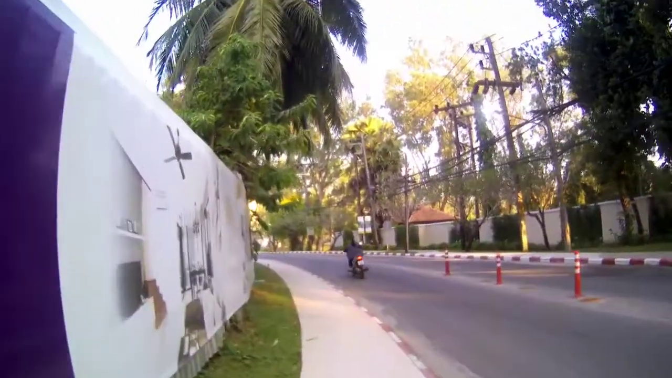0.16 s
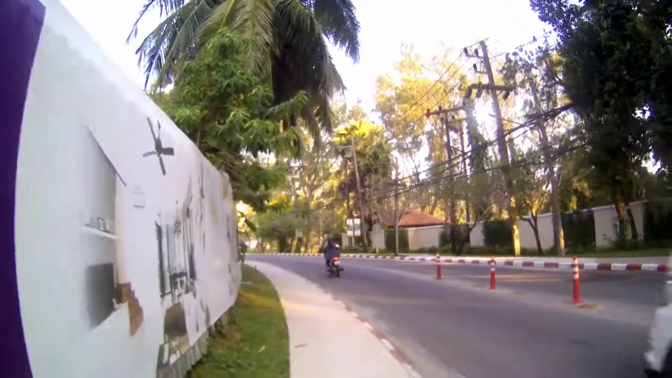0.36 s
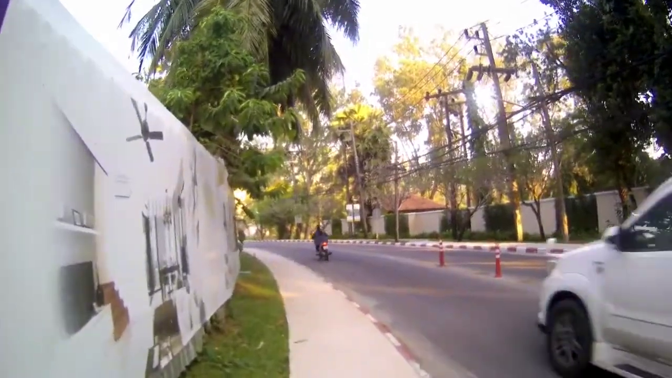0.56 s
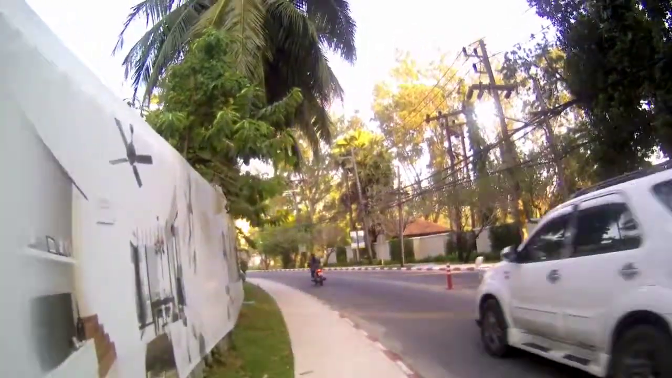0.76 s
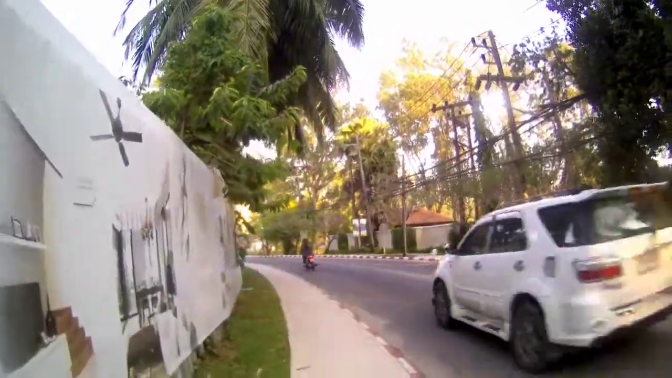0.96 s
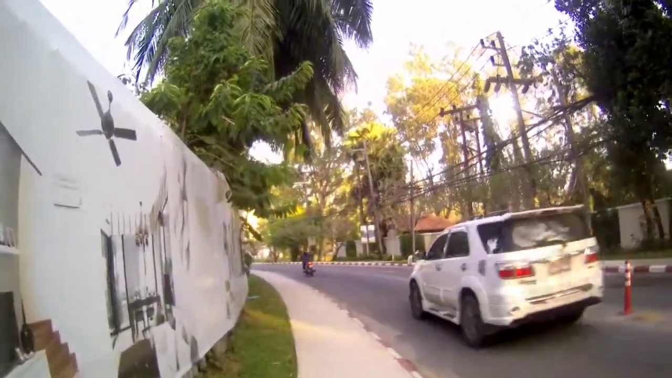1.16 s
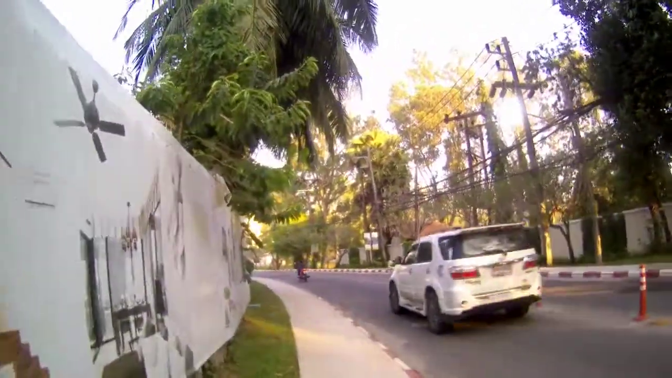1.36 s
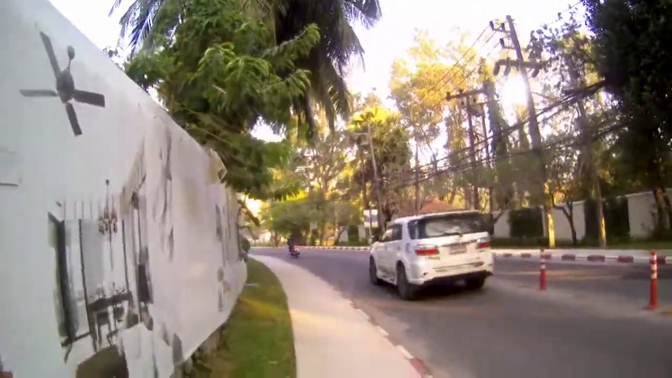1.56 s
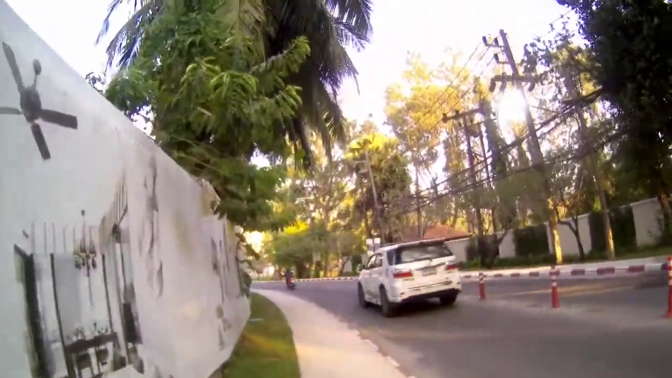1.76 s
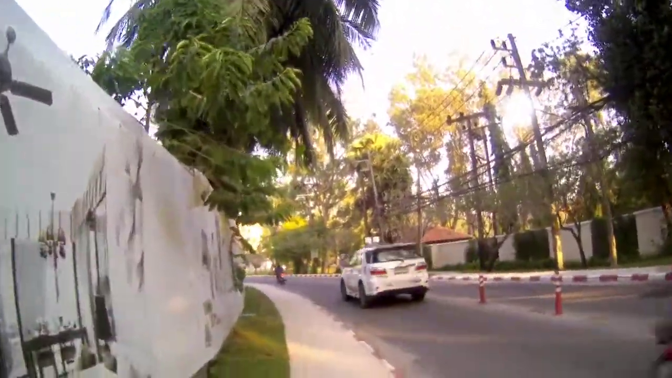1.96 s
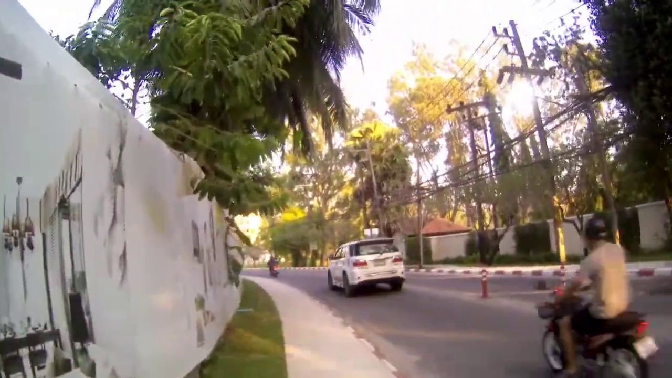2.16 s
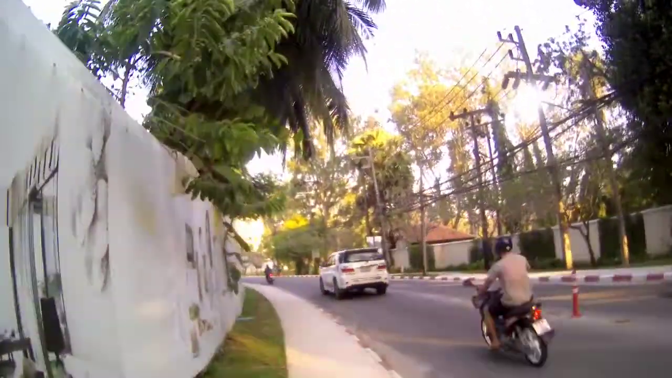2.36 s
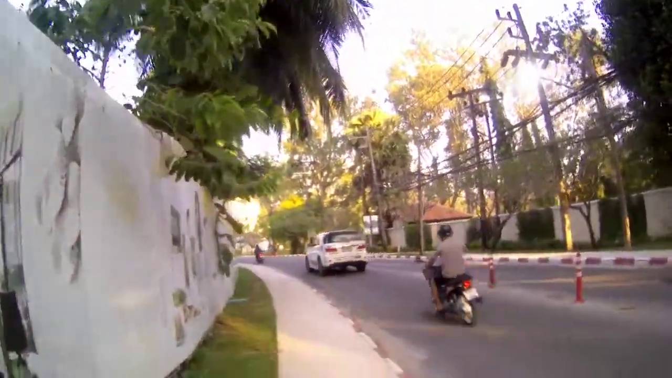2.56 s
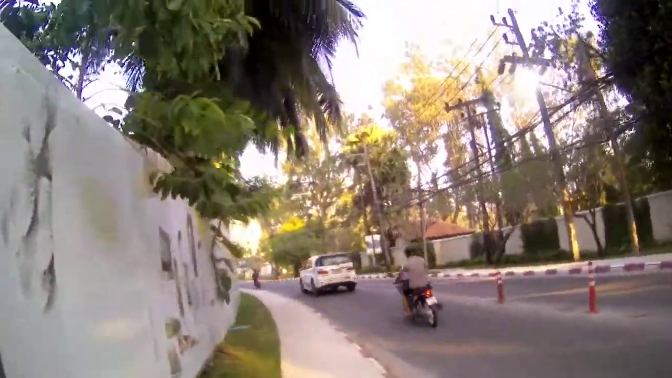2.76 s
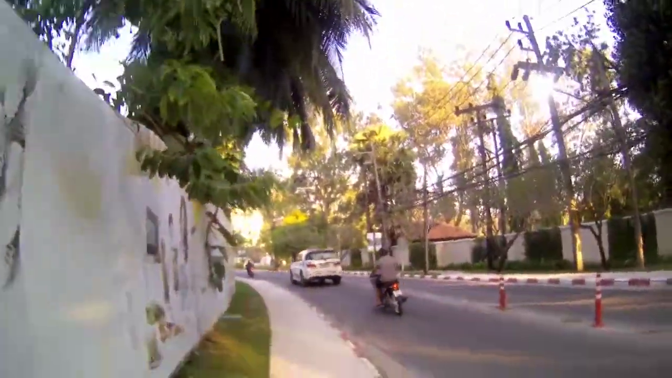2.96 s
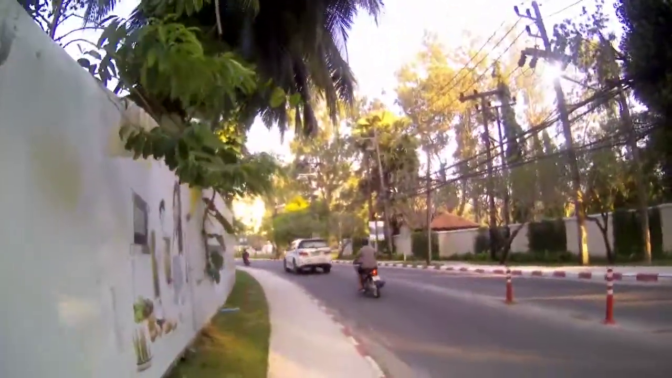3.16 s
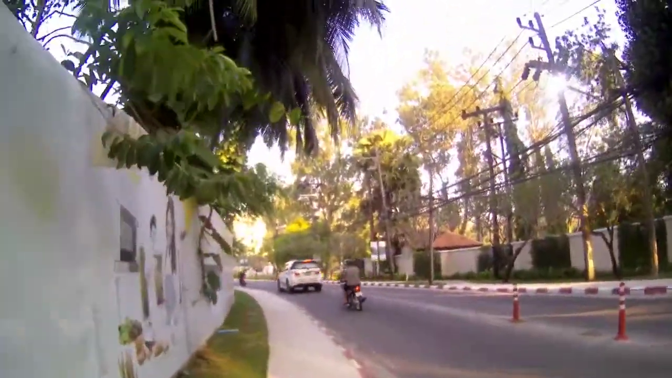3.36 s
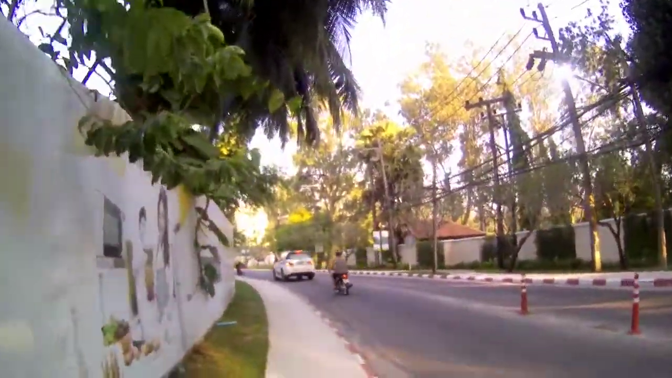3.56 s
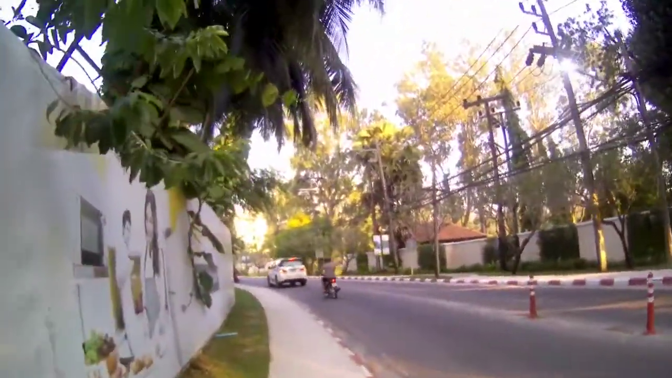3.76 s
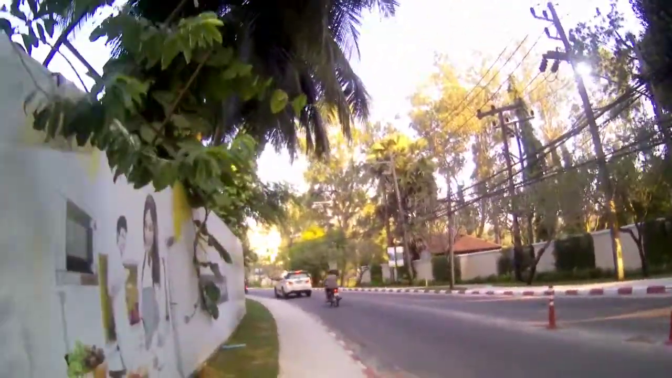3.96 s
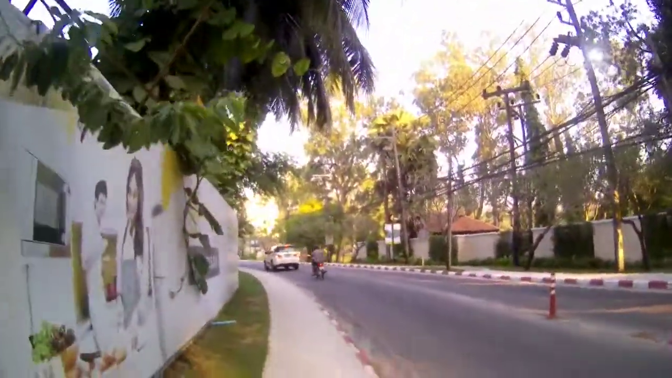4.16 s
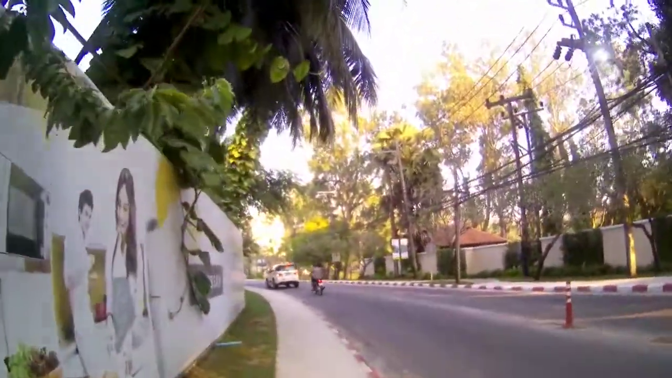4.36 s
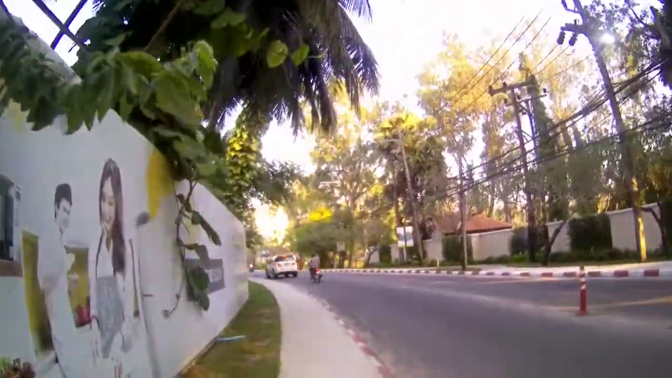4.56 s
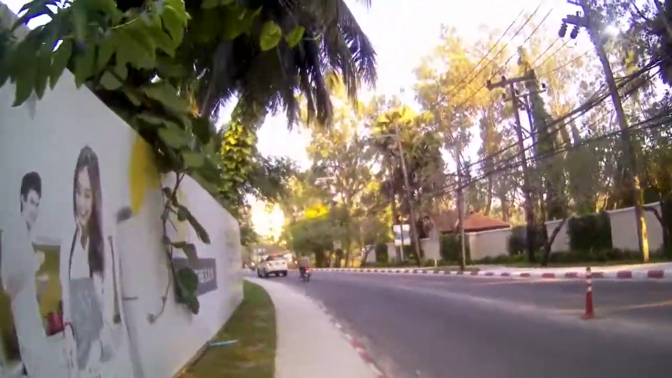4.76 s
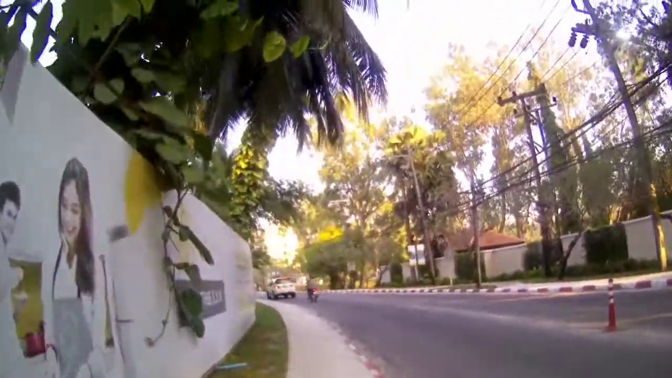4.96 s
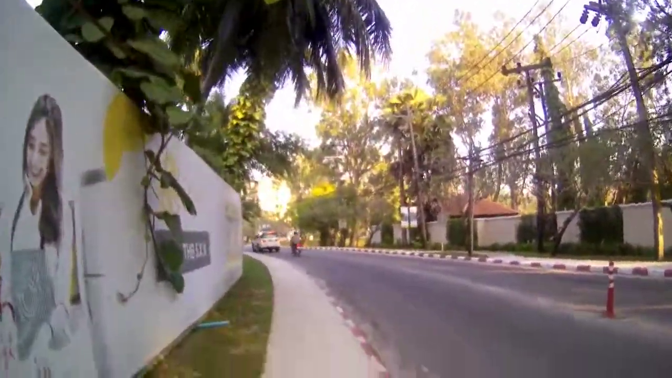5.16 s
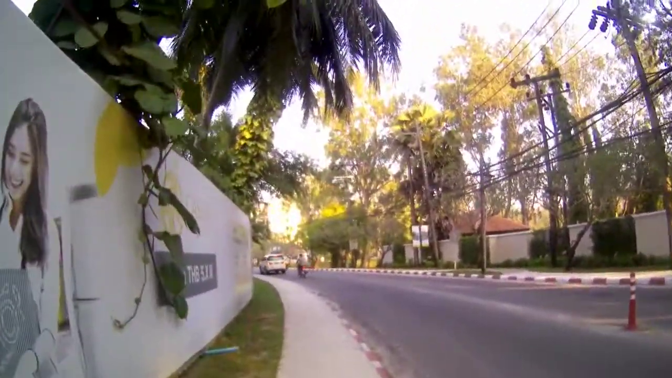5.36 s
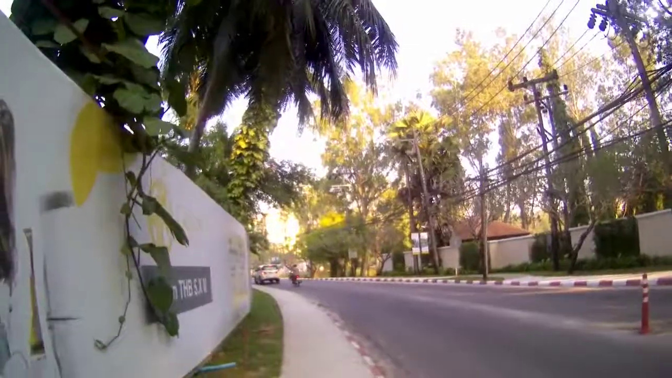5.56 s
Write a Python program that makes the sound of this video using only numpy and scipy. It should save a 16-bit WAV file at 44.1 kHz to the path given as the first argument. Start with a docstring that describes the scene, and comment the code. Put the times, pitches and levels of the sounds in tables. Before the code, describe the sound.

A car passes close by on a road, its tyres roaring and hissing over a low rumble and a faint whine. A small single-cylinder motorcycle follows, its exhaust booming and its engine clattering as it goes by, then putters away, slowing a little. Distant traffic murmurs throughout. The microphone sounds dull, with little treble, and overloads slightly as each vehicle passes.

```python
"""A car's tyres roar close by, then a small motorcycle barks past and putters off, slowing a little.
Tread on asphalt makes the roar, hiss and whine; a bend takes the tyres behind the roadside wall.
The motorcycle's single cylinder kicks exhaust and airbox resonances once a cycle, over throb and clatter.
Distant traffic murmurs throughout. Both vehicles overload a narrow-band microphone."""
import sys
import numpy as np
from scipy.fft import rfft, irfft, next_fast_len
from scipy.io import wavfile
from scipy.ndimage import uniform_filter1d, map_coordinates

SR = 44100
rng = np.random.default_rng(int(sys.argv[2]) if len(sys.argv) > 2 else 0)


def to_wav(s):
    """Save 16-bit WAV."""
    ch = np.atleast_2d(s).T  # columns
    pcm = np.round(np.clip(ch, -1, 1) * 32767)  # PCM
    wavfile.write(sys.argv[1], SR, pcm.astype(np.int16))


N = 247401
TIME_S = np.arange(N) / SR


def amp(db):
    """Decibels to gain."""
    return 10 ** (np.asarray(db) / 20)


def unit(x):
    """Scale to rms 1."""
    return x / np.sqrt(np.mean(x ** 2) + 1e-20)


def curves(rows):
    """One value per sample for each column after t/s."""
    times_s, *columns = np.transpose(rows)
    return [np.interp(TIME_S, times_s, column) for column in columns]


def wobble(rate_hz):
    """Smooth random curve, rate_hz knots a second."""
    knots = rng.standard_normal(int(N * rate_hz / SR) + 4)
    return map_coordinates(knots, [TIME_S * rate_hz])


def filtered(x, response):
    """Zero-phase filter with gain response(f/Hz)."""
    size = next_fast_len(N + SR // 2)
    return irfft(rfft(x, size) * response(np.fft.rfftfreq(size, 1 / SR)), size)[:N]


def colour(x, spectrum):
    """Shape x by (f/Hz, level/dB) points on a log-frequency axis."""
    points_hz, db = np.transpose(spectrum)
    return filtered(x, lambda hz: amp(np.interp(np.log(hz + 1), np.log(points_hz), db)))


def noise(spectrum):
    """Coloured noise, rms 1."""
    return unit(colour(rng.standard_normal(N), spectrum))


def pass_by(part):
    """Gain of a part that nears and recedes, loudest as it faces the microphone."""
    # part: closest t/s, level/dB, approach/s, retreat/s, loss per doubling of distance/dB
    passes = { "exhaust": (2, -8.5, .56, 0.37, 23.5), "throb": (1.5, -17.5, .6, 1.27, 11.5),
              "airbox": (1.52, -18.5, 0.35, 0.06, 4.5), "clatter": (1.94, -15.5, .7, 0.24, 11),
              "motorcycle tyres": (2, -17.5, 0.6, 0.37, 5.5), "car tyres": (0.44, -11, 2.7, 1.3857, 11.5),
              "tread whine": (0.4052, -12, .35, 1, 11.5), "car hiss": (.55, -10, .85, 0.1659, 11),
              "car rumble": (0.43, -15.5, 1.9, 1.01, 12.5), "car drone": (0, -20.5, .5, .3, 7),
              "car hum": (0.86, -20.5, 0.2, 0.12, 6.5), }
    closest_s, db, approach_s, retreat_s, loss_db = passes[part]
    offset_s = TIME_S - closest_s
    distance = np.hypot(1, offset_s / np.where(offset_s < 0, approach_s, retreat_s))  # 1 at closest
    return amp(db - loss_db * np.log2(distance))


def distant_traffic():
    """Low murmur and a tyre band, with a ground-reflection hollow between."""
    # traffic spectrum: f/Hz, level/dB
    murmur = [(20, -12), (45, 8.5), (75, 5), (130, 4), (230, 0.5), (290, -4), (430, -3.5), (680, -9.5),
              (850, -4), (1200, -1.5), (1500, -12.5), (2300, -25.5), (3600, -31)]
    return amp(-25.5 + 2.0 * wobble(5)) * noise(murmur)


def car():
    """Tread hiss, body rumble and engine drone; Doppler shift lowers the engine as it passes."""
    # tread hiss spectrum: f/Hz, level/dB
    hiss_spectrum = [(300, -20.5), (620, 4.5), (900, -1), (1180, 6.5), (1500, -15.5), (2200, -15),
                     (2600, -17.5), (3100, -18), (3500, -19.5), (4000, -28)]
    # body rumble spectrum: f/Hz, level/dB
    rumble_spectrum = [(20, -15), (45, -4.5), (85, -5.5), (170, -1), (280, -6.5), (500, -3), (900, -13),
                       (1600, -38.5)]
    centre_hz, doppler_hz, abreast_s, glide_s = 44.9, 1.9, .56, .2
    firing_hz = centre_hz - doppler_hz * np.tanh((TIME_S - abreast_s) / glide_s)
    phase = 2 * np.pi * np.cumsum(firing_hz) / SR
    drone = pass_by("car drone") * amp(1.1 * wobble(8)) * unit(np.sin(phase))
    hum = pass_by("car hum") * amp(3.2 * wobble(30)) * unit(np.sin(4 * phase + 0.69 * wobble(25)))
    grit = unit(amp(2.2 * wobble(70)))  # coarse patches of asphalt
    hiss = pass_by("car hiss") * grit * noise(hiss_spectrum)
    rumble = pass_by("car rumble") * noise(rumble_spectrum)
    return hiss + rumble + drone + hum


def tyre_roar():
    """Both vehicles' tread roars on asphalt; past the bend the wall shadows it."""
    # roar spectrum: f/Hz, level/dB
    roar_spectrum = [(25, -7.5), (70, -7), (200, -8), (290, -9.5), (440, -6.5), (690, -11.5), (830, -0.5),
                     (1050, -4.5), (1280, -3), (1480, -14.5), (1900, -19), (2300, -30.5), (3200, -41),
                     (4000, -31)]
    bend_s, shadow_db_per_s = 3.73, 2
    shadow_db = shadow_db_per_s * np.maximum(TIME_S - bend_s, 0)
    gain = np.hypot(pass_by("car tyres"), pass_by("motorcycle tyres"))
    return gain * amp(1.1 * wobble(13) - shadow_db) * noise(roar_spectrum)


def tread_whine():
    """Tread blocks whine near 1 kHz; their uneven spacing smears the tone."""
    # whine pitch: t/s, f/Hz
    pitch_track = [(.25, 900), (.8, 1040), (1.5, 980), (1.9, 1030), (2.4, 1020), (2.8, 879), (3.6, 870),
                   (4.4, 1020), (5.2, 1050)]
    whine_hz, = curves(pitch_track)
    phase = 2 * np.pi * np.cumsum(whine_hz) / SR
    width_hz = 150
    whine = unit(wobble(width_hz) * np.cos(phase) + wobble(width_hz) * np.sin(phase))
    return pass_by("tread whine") * whine


def gas_resonance(cycle, firing_hz, ring_hz, t60_s, attack_s, scatter_db, detune_s):
    """Each firing kicks a slightly different ring; the last three overlap. Steady rms 1."""
    strength, sharpness = rng.standard_normal(size=(400, 2)).T
    firing = np.floor(cycle).astype(int)
    ring = np.zeros(N)
    for back in range(3):
        age_s = (cycle - firing + back) / firing_hz
        envelope = (1 - np.exp(-(age_s / attack_s) ** 2)) * np.exp(-np.log(1000) * age_s / t60_s)
        pitch_hz = ring_hz * (1 + detune_s * sharpness[firing - back] / t60_s)  # short rings stray more
        phase = 2 * np.pi * pitch_hz * (age_s - 0.755 * attack_s)
        ring -= amp(scatter_db * strength[firing - back]) * envelope * np.cos(phase)
    power = uniform_filter1d(uniform_filter1d(ring ** 2, size=5000), size=5000)
    return ring / np.sqrt(np.abs(power) + 1e-12)


def exhaust(cycle, firing_hz):
    """The pipe booms long while its mouth is near, then putters in shorter, lower thumps."""
    # exhaust heard from behind: t/s, ring f/Hz, level/dB
    putter = [(2.4, 165, -36), (2.75, 143, -20.5), (2.98, 114, -19.5), (3.3, 105.3, -23), (3.6, 118.6, -22),
              (3.85, 131.3, -22.5), (4.3, 113.8, -24), (4.62, 107.2, -27.5), (4.8, 122, -26.5),
              (5.25, 119.6, -25.5), (5.61, 120.4, -31.5)]
    boom_hz, boom_t60_s, putter_t60_s = 148.8, 0.076, 0.041
    putter_hz, putter_db = curves(putter)
    boom_gain = pass_by("exhaust")
    gain = np.hypot(boom_gain, amp(putter_db))
    boom_share = (boom_gain / gain) ** 2
    ring_hz = boom_share * boom_hz + (1 - boom_share) * putter_hz
    t60_s = boom_share * boom_t60_s + (1 - boom_share) * putter_t60_s
    return gain * gas_resonance(cycle, firing_hz, ring_hz, t60_s,
                                attack_s=0.0101, scatter_db=1.7, detune_s=0.00037)


def motorcycle():
    """One cylinder drives the exhaust, the airbox gulp, a low throb and the clatter."""
    # firing rate: t/s, f/Hz
    firing_track = [(0.0, 29.63), (1.2, 30.13), (1.8, 29.49), (2.5, 29.19), (3.2, 28.02), (3.9, 27.49),
                    (4.7, 25.96), (5.6, 25.53)]
    # mechanical noise spectrum: f/Hz, level/dB
    clatter_spectrum = [(100, -22.5), (330, -5.5), (520, 2.5), (750, -3.5), (1200, 4), (1550, -4.5),
                        (1950, -4), (2400, -12), (3200, -19), (4000, -17)]
    firing_hz, = curves(firing_track)
    cycle = np.cumsum(firing_hz) / SR - .08 + .015 * wobble(13)
    pipe = exhaust(cycle, firing_hz)
    airbox = pass_by("airbox") * gas_resonance(cycle + 0.1, firing_hz, ring_hz=227, t60_s=0.061,
                                               attack_s=0.0038, scatter_db=0, detune_s=0.0035)
    phase = 2 * np.pi * cycle
    throb = pass_by("throb") * amp(0.58 * wobble(15)) * (np.sin(2 * phase) + amp(-10) * np.sin(phase))
    surge = unit(amp(1.4 * np.cos(phase - 1.5)))  # valves and combustion, once a cycle
    clatter = pass_by("clatter") * surge * noise(clatter_spectrum)
    return pipe + airbox + throb + clatter


def scene():
    """Both vehicles over distant traffic, mono."""
    return (motorcycle() + tyre_roar() + tread_whine() + car() + distant_traffic())[None]


def record(dry):
    """Narrow-band microphone; overload flattens the peaks and crackles in the treble."""
    # response after the overloaded input: f/Hz, level/dB
    output_response = [(20, -0.5), (3000, 0), (4500, -5), (9000, -4.5), (15000, -2.5)]
    low_hz, mic_hz, top_hz, ceiling = 12, 3572, 15870, .705
    heard = filtered(dry[0], lambda hz: (hz > low_hz) / np.sqrt(1 + (hz / mic_hz) ** 30))
    clipped = heard / (1 + np.abs(heard / ceiling) ** 30) ** (1 / 30)
    return filtered(colour(clipped, output_response), lambda hz: hz < top_hz)[None]


dry = scene()
out = record(dry)
to_wav(out)
```